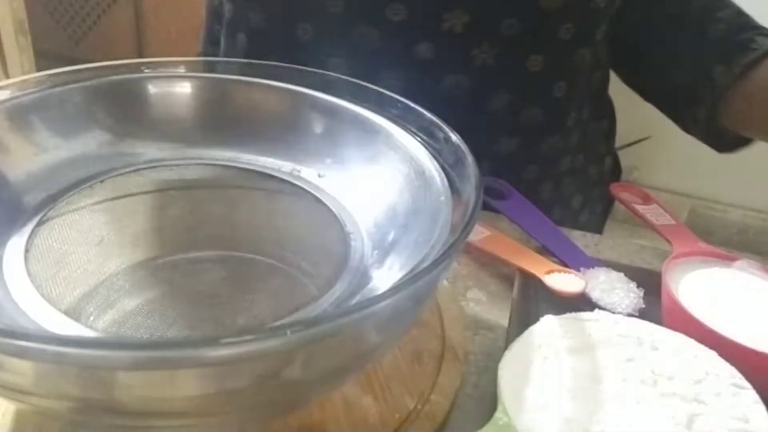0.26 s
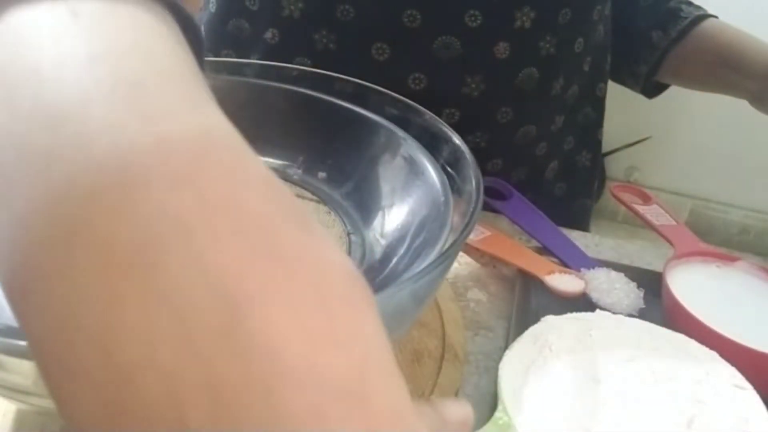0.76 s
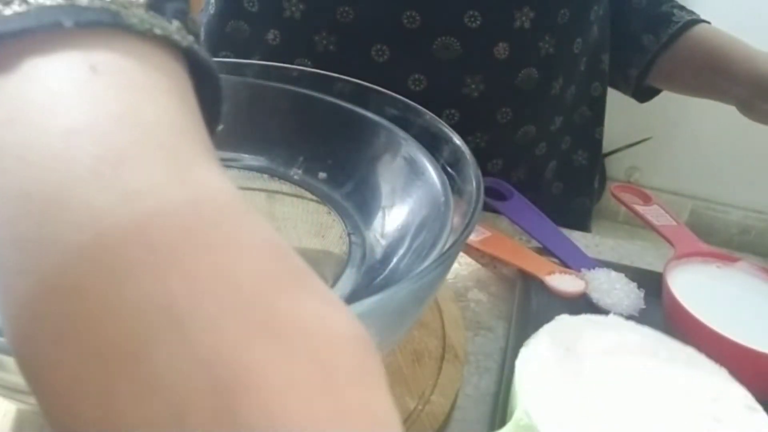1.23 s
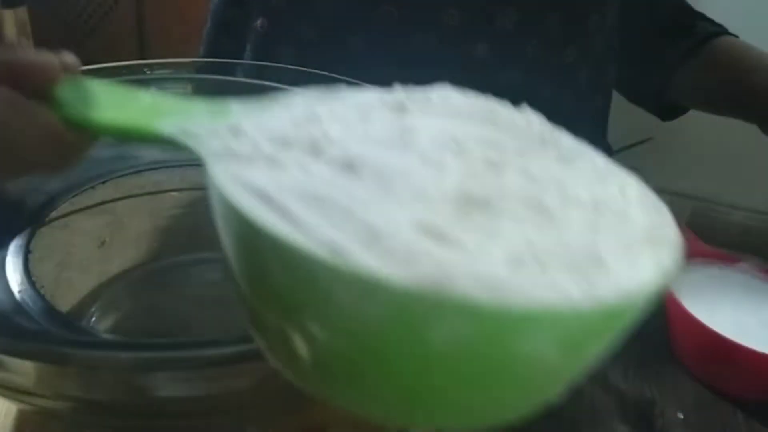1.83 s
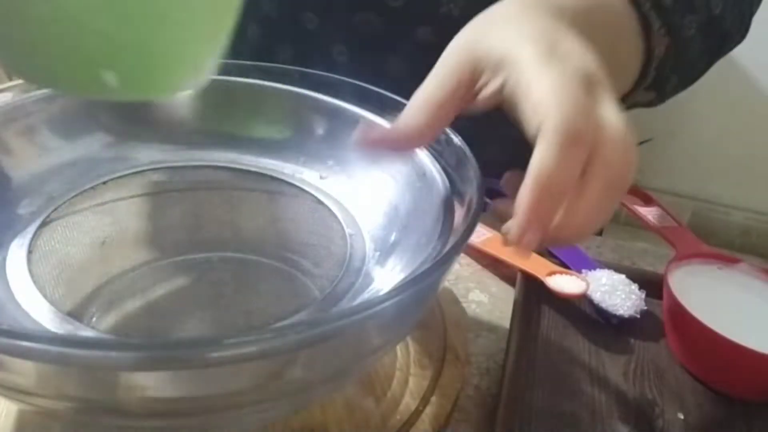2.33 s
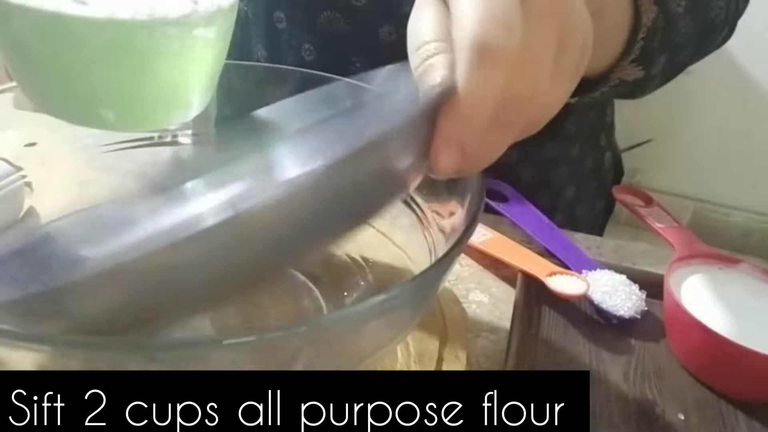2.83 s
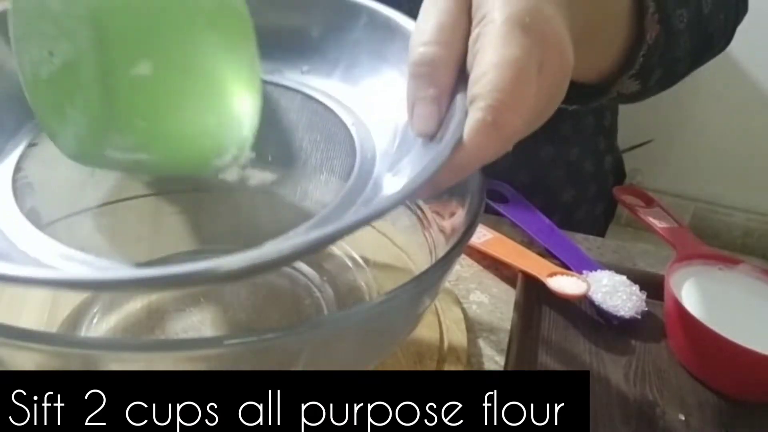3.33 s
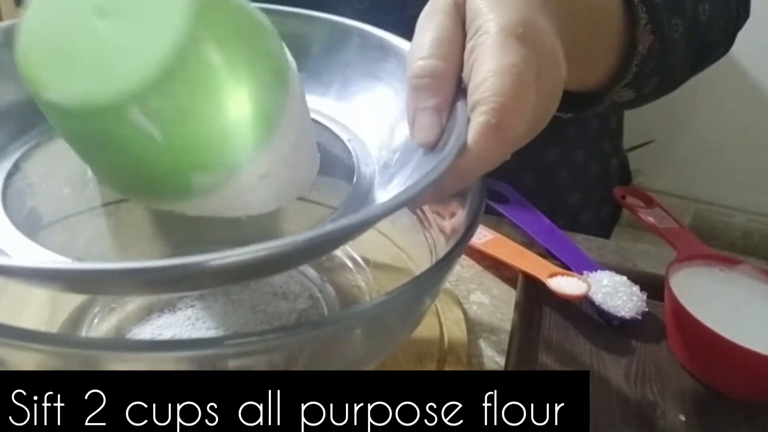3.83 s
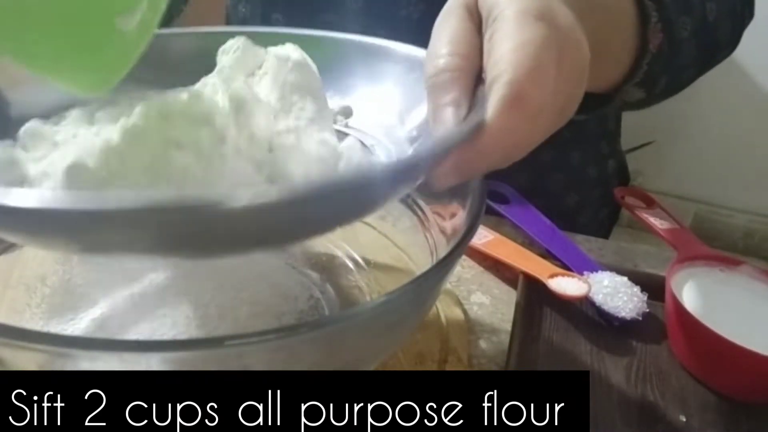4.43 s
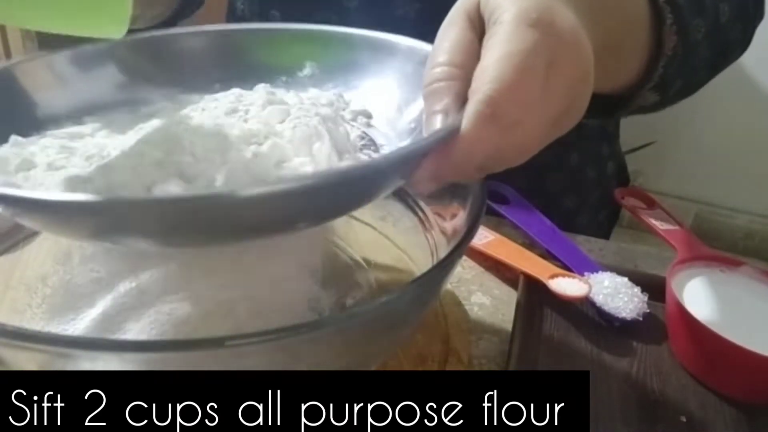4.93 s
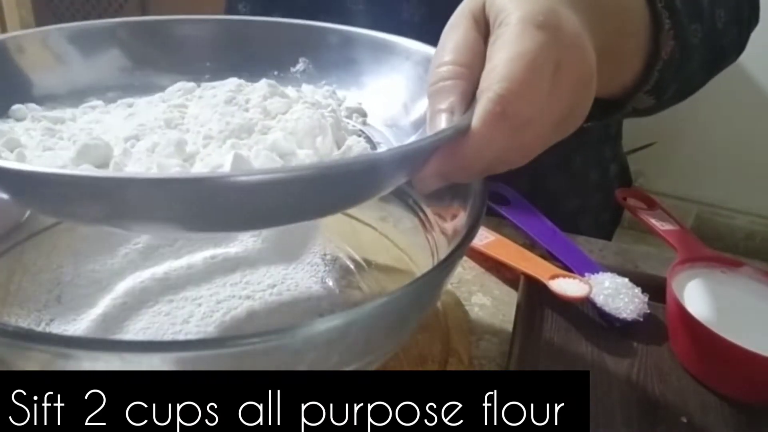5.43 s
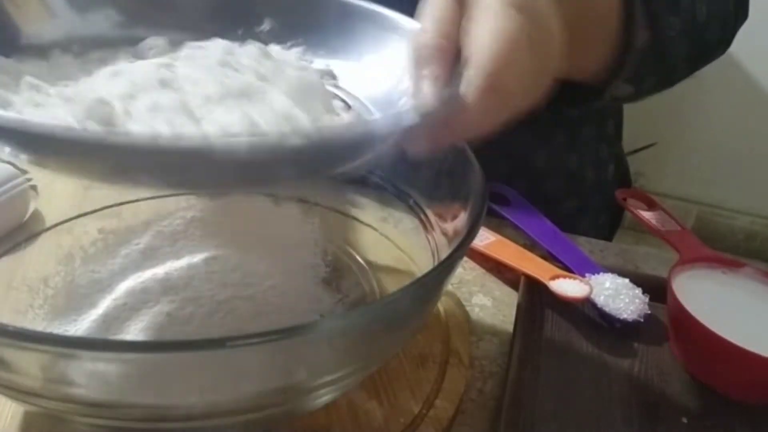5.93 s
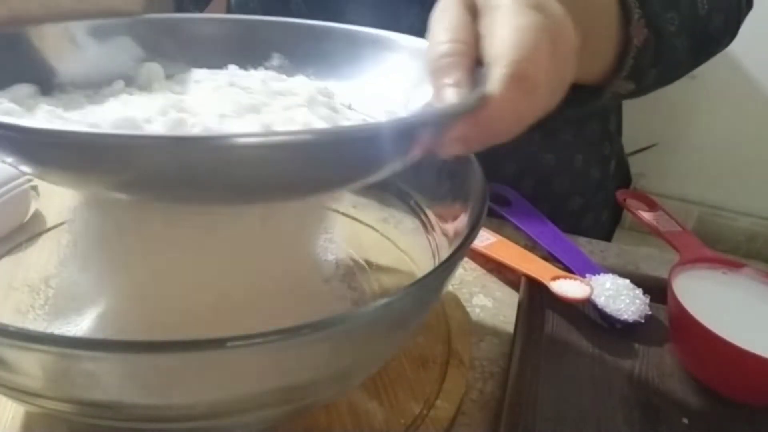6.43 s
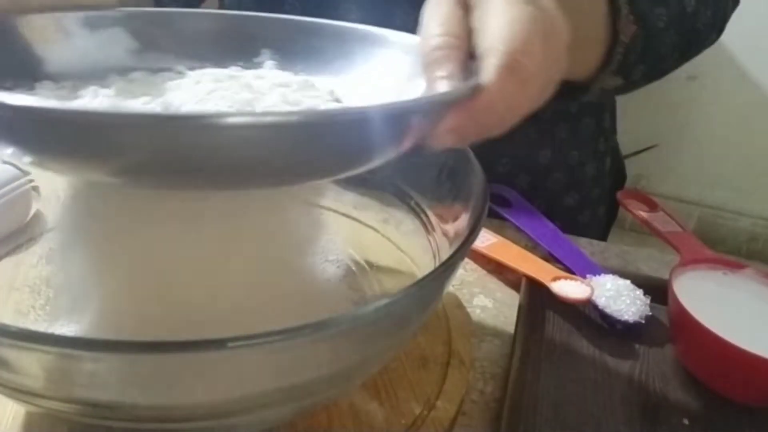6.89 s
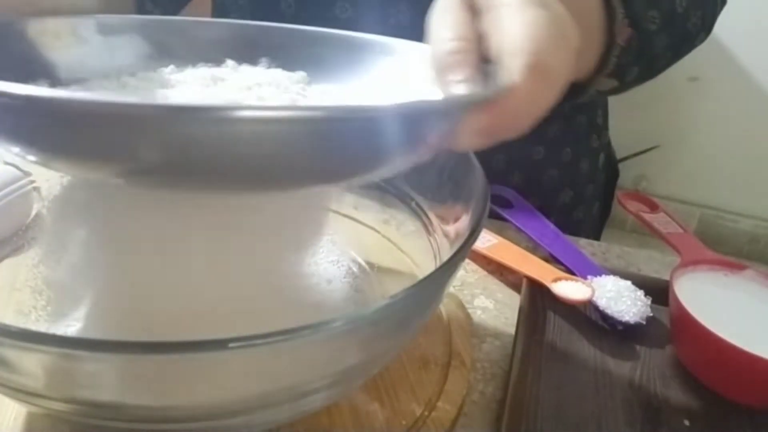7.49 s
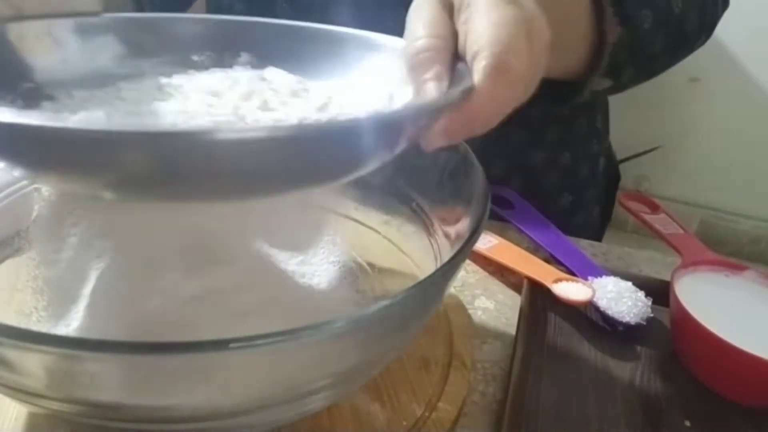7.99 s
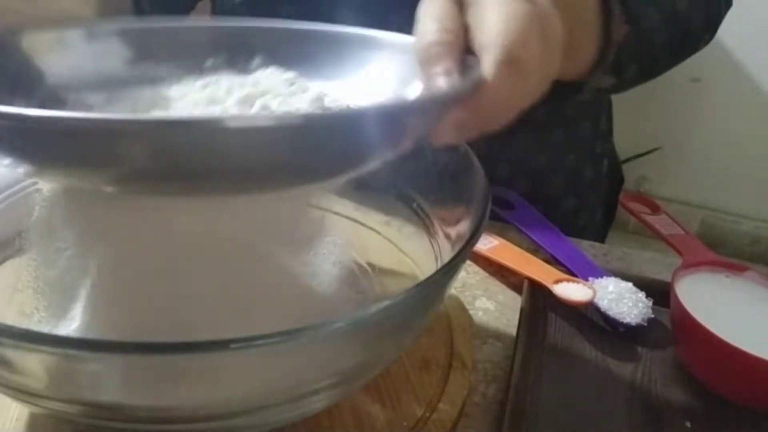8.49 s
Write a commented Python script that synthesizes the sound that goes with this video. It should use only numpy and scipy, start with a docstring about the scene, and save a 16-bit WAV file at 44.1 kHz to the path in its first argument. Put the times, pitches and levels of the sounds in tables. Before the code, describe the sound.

A metal sieve clinks on a glass bowl, wood bangs twice, then flour is sifted with soft, even swishes and ticks.

```python
"""A small, hard-walled kitchen, with a stereo pair near a glass bowl where flour is being sifted.
The steel sieve scrapes off the bowl and clinks on its rim, setting the glass singing. A plastic cup
judders across the sieve as it tips in flour, and something wooden bangs twice nearby. Then the sieve
is shaken at an even beat, about seven times a second: flour swishes through the wires and lumps tick
on the mesh. Behind it all lie a low room rumble and a faint hiss."""
import sys
import numpy as np
from scipy import signal
from scipy.fft import rfft, irfft
from scipy.io import wavfile
from scipy.ndimage import uniform_filter1d

SR = 44100
rng = np.random.default_rng(int(sys.argv[2]) if len(sys.argv) > 2 else 0)


def transcribe(signal):
    """Save signal, clipped to [-1, 1], as a 16-bit WAV file at the path in sys.argv[1]."""
    frames = np.atleast_2d(signal).T
    limited = np.clip(frames, -1, 1)
    pcm = np.round(limited * 32767).astype(np.int16)
    wavfile.write(sys.argv[1], SR, pcm)


N = 385875
TIME = np.arange(N) / SR

# spectrum of flour brushing the wires: f/Hz, level/dB
FLOUR_SPECTRUM = [(220, -23), (400, 2), (600, -12), (850, -7.5), (1300, -17), (1650, -3), (2300, -9.5),
                  (3100, 2), (4300, -0.5), (5700, -3), (7200, 7.5), (9500, 1), (12500, 0), (15500, 2)]
# strokes of the sieve at their fastest, timid at first, then at an even beat: t/s, level/dB
SHAKES = [(4.13, -67), (4.245, -70), (4.35, -74), (4.45, -73), (4.555, -67.5), (4.661, -72), (4.762, -66.5),
          (4.872, -66), (5.926, -60.5), (6.083, -62.5), (6.205, -62.5), (6.36, -58.5), (6.522, -59),
          (6.668, -58.5), (6.809, -58.5), (6.959, -58), (7.106, -57.5), (7.251, -58), (7.406, -58),
          (7.549, -60.5), (7.692, -59), (7.831, -59.5), (7.98, -59.5), (8.123, -61.5), (8.266, -60.5),
          (8.412, -58.5), (8.558, -58.5), (8.706, -58.5)]
# loose flour sliding by itself: t/s, level/dB, length/s
SLIDES = [(2.205, -69.5, 0.096), (3.85, -76, 0.096)]
# modes of the mesh, damped by its load of flour: f/Hz, level/dB, t60/s
MESH_MODES = [(600, -8, .07), (820, -9, .07), (1130, -9, .07), (1300, -7, .08), (1750, -8, .08),
              (2240, -1, .14), (2640, -2, .12), (2820, -3, .12), (2980, -1, .12), (3255, -2, .12),
              (3370, -3, .12), (3770, -2, .14), (4400, -7, .08), (7080, -3, .06)]
# large lumps thrown against the sieve: t/s, level/dB, note of the spot hit f/Hz
LUMPS = [(5.912, -43, 2240), (6.338, -46, 2580), (6.356, -39, 1250), (6.366, -41, 3250), (6.535, -44, 2640),
         (6.670, -38, 3010), (6.807, -37, 2640), (6.816, -39, 3260), (6.955, -39, 3770),
         (7.041, -37.5, 2820), (7.099, -33.5, 2240), (7.253, -42, 3360), (7.411, -35.5, 3130),
         (7.548, -39, 3000), (7.692, -38.5, 2980), (7.834, -41, 2240), (7.981, -38, 3000),
         (8.118, -45, 2640), (8.265, -38, 2660), (8.402, -26.5, 3010), (8.460, -39, 3370),
         (8.684, -46, 2240), (8.702, -33, 3010)]

# brief rubs of steel on glass: t/s, level/dB, length/s, tilt/(dB/octave), squeal f/Hz, squeal level/dB
RUBS = [(0.414, -75, 0.044, -12.5, 680, 6), (0.568, -80.5, 0.095, 2, 4120, 8),
        (0.822, -74, 0.02, 3, 3320, 9), (1.152, -64, 0.078, -2.5, 1730, 0),
        (1.204, -63.5, 0.021, -6.5, 1720, 7), (2.406, -70, 0.019, -5, 1730, 1),
        (3.247, -50, 0.031, -2.5, 2700, -41), (4.603, -75, 0.1, -5, 2220, -7),
        (4.957, -85, 0.21, -20, 760, 11), (5.373, -78.5, 0.14, -8.5, 2340, -3)]
# spectrum of steel rubbing on glass: f/Hz, level/dB
RUB_SPECTRUM = [(180, -62.5), (300, -23.5), (676, -9), (1080, -1.5), (1170, -5), (1470, -4.5), (1770, -2),
                (2020, -3), (2230, 1.5), (3610, -3), (4450, -0.5), (5380, -11.5), (7010, -2),
                (15800, -12.5)]
# pressure of the sieve as it is dragged off the rim, catching on the way: t/s, level/dB
LIFT_PRESSURE = [(2.43, -61.5), (2.46, -54.5), (2.49, -61), (2.56, -53), (2.585, -69), (2.632, -56),
                 (2.652, -49), (2.69, -53), (2.755, -71), (2.786, -47.5), (2.83, -67.5)]
# sharp taps of the sieve: t/s, level/dB, tilt/(dB/octave), scuff level/dB
TAPS = [(1.214, -32, -5, 6), (2.437, -33, -4, 4), (2.458, -25, -4, 4), (2.507, -36, -2, 6),
        (2.547, -34, -1, 6), (2.648, -26, -1.5, 8), (2.745, -32, -3, 2), (2.765, -23, 7, 8),
        (2.784, -32, -1, 6), (2.944, -14.5, -0.5, -2), (2.947, -22, -1, 6), (2.954, -29, 0, 6),
        (3.133, -44, -2, 6), (3.186, -38.5, -1, 8)]
# spectrum of a tap on the steel: f/Hz, level/dB
TAP_SPECTRUM = [(120, -76), (200, -14), (1060, -8), (1200, -6), (1490, -2.5), (1680, -10.5), (1930, -4.5),
                (2890, -8.5), (3340, -2), (4500, -5.5), (5300, -8.5), (15800, -18.5)]
# modes of the sieve's steel pan: f/Hz, level/dB, t60/s
PAN_MODES = [(689, -12, .25), (885, -12, .3), (1320, -9, .16), (1480, -3, .18), (2060, -3, .16),
             (2293, -8, .16), (2520, -3, .16), (2780, -5, .14), (3060, -9, .12), (3500, -3, .18),
             (3740, -3, .15), (3880, -6, .16), (5010, -14, .14), (7170, -10, .12)]
# squeaks of the sticking steel: t/s, level/dB, half-length/s, start f/Hz, end f/Hz
SQUEAKS = [(1.00, -75, .03, 1700, 1720), (1.125, -71, .02, 1720, 1720), (1.168, -64, .014, 1620, 1660),
           (1.214, -57, .006, 1630, 1690), (1.245, -69, .009, 1720, 1720), (2.515, -61, .018, 1330, 1300),
           (2.557, -58, .012, 3130, 3230), (2.653, -47.5, .008, 2490, 2540),
           (2.657, -47.5, .009, 2030, 2075), (2.665, -53, .010, 2930, 2850),
           (2.670, -46.5, .008, 3730, 3765), (2.674, -53, .008, 2560, 2530), (2.712, -54, .016, 3480, 3515),
           (2.714, -59, .010, 2080, 2060), (2.788, -55, .008, 1480, 1440), (2.794, -52, .010, 2720, 2790),
           (2.803, -49, .013, 3520, 3480), (4.08, -80, .025, 4300, 4340), (4.615, -76, .012, 3790, 3770),
           (4.70, -85, .035, 4650, 4850), (4.824, -70, .011, 3800, 3780)]

# touches that set the bowl singing: t/s, level/dB, build-up/s
BOWL_TOUCHES = [(2.651, -51, 0.11), (4.079, -77, 0.0044), (2.944, -19.5, 0.34), (3.239, -62, 0.058),
                (4.601, -42, 0.48), (4.819, -63, 0.033), (6.381, -73, 0.021), (6.811, -73, 0.022),
                (7.129, -69.5, 0.02)]
# the two halves of the bowl's split lowest mode: left level/dB, right level/dB, t60/s
BOWL_HALVES = [(-7.5, -0.5, 0.58), (-9.5, -4.5, 0.58)]
# the bowl's upper modes, woken only by a hard hit: f/Hz, level/dB, t60/s
BOWL_OVERTONES = [(1497, -4, .25), (1814, -5, .4), (1938, -7, .45), (2735, -2, .38), (3297, -3, .3),
                  (3352, -5, .36), (3779, 0, .25), (3946, -6, .25), (4344, -8, .25), (5184, -15, .25),
                  (6309, -8, .22), (7838, -15, .2)]

# the cup dragged across the sieve: t/s, judder level/dB, rasp level/dB, rise/s, fall/s
CUP_DRAGS = [(3.547, -55, -70, 0.006, 0.0026), (3.571, -38, -43, 0.015, 0.0064),
             (3.594, -36.5, -43.5, 0.0079, 0.0065), (3.617, -39.5, -66, 0.007, 0.0053),
             (3.658, -43, -61, 0.0079, 0.013)]
# modes of the cup's hollow: f/Hz, level/dB, t60/s
CUP_MODES = [(336, 3, 0.017), (423, -6, 0.058), (499.5, -5.5, 0.18), (608, -5, 0.096), (699, -4, 0.073)]
# the judder locking onto a resonance of the cup: t/s, level/dB, half-length/s, start f/Hz, end f/Hz
CUP_BOOMS = [(3.551, -48, .004, 340, 325), (3.560, -49, .009, 685, 610), (3.587, -45, .009, 475, 490),
             (3.605, -51, .006, 335, 325), (3.612, -42.5, .009, 505, 495), (3.614, -48, .007, 680, 680),
             (3.660, -57, .005, 335, 325)]
# spectrum of plastic rasping on steel: f/Hz, level/dB
RASP_SPECTRUM = [(470, -45), (800, -7), (970, -0.5), (1240, -4), (1610, -5), (2460, -0.5), (3900, -7),
                 (5200, -14.5), (7110, -4.5), (8360, -14), (15800, -19.5)]
# handling bumps of cup and pan: t/s, level/dB, tilt/(dB/octave), scuff level/dB
BUMPS = [(1.739, -18, -4.5, -8), (1.762, -36, 1, 4), (1.778, -37, 1, 4), (2.795, -37, -3, 14),
         (4.475, -30, -7, 0), (4.777, -39, -7, 4), (6.96, -40, -4.5, 15), (8.15, -38, -10, 8)]
# spectrum of a dull bump: f/Hz, level/dB
BUMP_SPECTRUM = [(160, -40), (280, -2.5), (596, -5), (774, -15), (1020, -6), (1180, -25), (1670, -15.5),
                 (3300, -28), (9000, -47), (11700, -82), (19800, -120)]

# wooden knocks and their rattles: t/s, level/dB, tilt/(dB/octave), lowest driven f/Hz
KNOCKS = [(5.385, -16, 6, 450), (5.388, -7, 4, 400), (5.401, -13, -4, 170), (5.419, -13.5, 4.5, 140),
          (5.434, -25, -1, 121), (5.532, -44, -3, 130), (5.587, -17, 4, 245), (5.596, -8.5, 2, 108),
          (5.606, -23.5, -2.5, 110), (5.668, -55, -7, 203)]
# spectrum of a knock on wood: f/Hz, level/dB
KNOCK_SPECTRUM = [(90, -22), (160, 1.5), (215, 3), (330, 1), (440, 1), (550, 3), (690, -3.5), (790, -7),
                  (910, 3.5), (1030, -9), (1520, -10.5), (2400, -22), (3600, -33), (5800, -43.5),
                  (7150, -39.5), (9000, -56), (15500, -56)]
# modes of the wood and the corner around it: f/Hz, level/dB, t60/s
WOOD_MODES = [(158, 0, .55), (199, 0, .22), (277, -1, .3), (333, -1, .28), (402, 0, .22), (520, -2, .2),
              (546, -3, .2), (614, -3, .24), (681, 0, .22), (778, -3, .18), (832, -4, .31), (918, 3, .25),
              (1417, -2, .25), (1518, 3, .22), (1906, 1, .2), (2056, 3, .2), (2432, 3, .18)]
# the short, dead boom of the struck panel: f/Hz, level/dB, t60/s
PANEL_MODES = [(490, 0, .035), (590, -1, .03), (670, -3, .035)]
# dishes ringing along with the knocks: f/Hz, level/dB, t60/s
DISH_MODES = [(894, -11, .48), (947, -10, .42), (1028, -7, .3), (1077, -9, .6), (1179, -9, .58),
              (1260, -9, .45), (1453, -7, .4), (1604, -7, .35), (1690, -8, .55), (1733, -8, .6),
              (1814, -7, .5), (1997, -7, .4), (2126, -6, .25), (2277, -6, .3)]

# spectrum of the room rumble: f/Hz, level/dB
RUMBLE_SPECTRUM = [(25, -32), (50, -23.5), (75, -13.5), (93, -0.5), (110, -8.5), (135, -5.5), (158, -1),
                   (175, 5), (195, -9), (280, -22.5), (450, -41), (900, -70.5)]
# slow rise and fall of the rumble: t/s, level/dB
RUMBLE_LEVEL = [(.45, -55.5), (1.3, -59.5), (1.6, -68.5), (2.1, -70), (2.7, -66), (3.3, -70), (4.2, -71),
                (4.6, -66), (5.3, -69), (6.3, -66), (6.55, -72.5), (6.92, -63), (7.45, -71.5),
                (7.85, -61.5), (8.15, -68.5), (8.75, -66)]
# spectrum of the steady hiss: f/Hz, level/dB
HISS_SPECTRUM = [(150, -23), (250, -4), (413, -10), (813, -14), (967, -11.5), (2470, -18), (3370, -21),
                 (3620, -24.5), (4080, -21.5), (4770, -24.5), (7000, -22.5), (7600, -19), (8300, -21),
                 (9230, -28.5), (15800, -27)]
# spectrum of the louder opening hiss: f/Hz, level/dB
OPENING_HISS_SPECTRUM = [(150, -26), (250, -3), (413, -8.5), (700, -9.5), (967, -13), (2470, -17),
                         (3620, -19), (4080, -19.5), (4770, -22.5), (6990, -14.5), (9230, -24.5),
                         (15800, -26)]
# reverberation time of the kitchen: f/Hz, t60/s
KITCHEN_T60 = [(100, 0.74), (300, 0.33), (1000, 0.31), (3000, 0.27), (7000, 0.3), (15000, 0.18)]
# likeness of the room sound at the two microphones: f/Hz, correlation
MIC_LIKENESS = [(60, 0.74), (140, 1), (290, 0.7), (640, 0.33), (1400, -0.31), (3000, 0.049), (15000, 0.032)]


def flour():
    """Grains brush the wires on each stroke, crumbs tick on the mesh and the pan knocks in the hand."""
    speed = strokes(shakes() + [(s, db, length / 2, length / 2) for s, db, length in SLIDES])
    brushing = through(speed * grains(per_s=5000, spread_db=4.8), click(FLOUR_SPECTRUM))
    crumbs = 0
    for hz, _, _ in MESH_MODES:
        patchy_db = 3 * waver(per_s=9)   # the heap shifts, hitting now one resonance, now another
        crumbs += from_db(patchy_db) * resonance(grains(per_s=70, spread_db=3), hz, width_hz=60)
    crumbs = from_db(-4.5) * speed * rms_one(crumbs)
    jolting = uniform_filter1d(speed, size=5000) * grains(per_s=60, spread_db=0)
    jolts = from_db(-15.5) * through(jolting, click(BUMP_SPECTRUM))
    return kitchen(crumbs, wet_db=-3) + kitchen(brushing + jolts, wet_db=7)


def shakes(rise_s=0.017, fall_s=0.027, at_db=-59.5, stretch_per_db=0.15):
    """The harder a stroke, the longer the flour slides: t/s, level/dB, rise/s, fall/s."""
    rows = []
    for s, db in SHAKES:
        stretch = np.exp(stretch_per_db * (db - at_db))
        rows.append((s, db, rise_s * stretch, fall_s * stretch))
    return rows


def lumps(note_db=-3, note_t60_s=0.021):
    """Each lump ticks on the sieve and briefly sounds the note of the spot where it lands."""
    ticking = blows([(s, db, -1, 0) for s, db, _ in LUMPS], TAP_SPECTRUM)
    notes = np.zeros((2, N))
    for s, db, hz in LUMPS:
        add(notes, s, from_db(db + note_db) * ringing([(hz, 0, note_t60_s)]))
    return kitchen(ticking, wet_db=1.5) + notes + rings(ticking, MESH_MODES, ring_db=-6)


def sieve_on_rim(rise_share=0.58):
    """Steel sticks and slips on the glass, each rub catching one resonance, and now and then taps it."""
    slips = grains(per_s=1800, spread_db=5.5)
    rubbing = lift_off(slips)
    for s, db, length, tilt_db, squeal_hz, squeal_db in RUBS:
        rise = length * rise_share
        friction = slips * strokes([(s, db, rise, length - rise)])
        rubbing += scrape(friction, tilt_db)
        rubbing += from_db(squeal_db) * resonance(friction, squeal_hz, width_hz=77)
    tapping = blows(TAPS, TAP_SPECTRUM, scuff_s=0.002)
    rubs = kitchen(rubbing, wet_db=4.5) + rings(rubbing, PAN_MODES, ring_db=-7)
    taps = kitchen(tapping, wet_db=-2) + rings(tapping, PAN_MODES, ring_db=-11)
    return rubs * left_right(-1.5, 0.5) + taps * left_right(2.5, 4.5)


def lift_off(slips, outward_at_s=2.46, outward_for_s=0.047):
    """One long scrape as the sieve leaves the rim, brightening as the contact moves out to the edge."""
    friction = slips * from_db(np.interp(TIME, *np.transpose(LIFT_PRESSURE), left=-200, right=-200))
    edge = np.clip((TIME - outward_at_s) / outward_for_s, 0, 1)
    return scrape(friction * (1 - edge), tilt_db=-7) + scrape(friction * edge, tilt_db=-0.5)


def scrape(friction, tilt_db):
    """Every slip sounds a tiny click of steel on glass."""
    return signal.oaconvolve(friction, click(RUB_SPECTRUM, tilt_db))[:N]


def squeaking_steel():
    """The steel squeaks at a pitch that shifts as the point of contact moves."""
    return kitchen(stick_slip(SQUEAKS), wet_db=-5, lag_samples=3) * left_right(-2, 0)


def bowl(split_hz=(1050, 1052.1), clink_s=2.944, clink_db=-18.5):
    """Each touch feeds two close pitches of the glass, which beat; the hard clink adds overtones."""
    out, t = np.zeros((2, N)), TIME[:SR]
    for s, db, build_s in BOWL_TOUCHES:
        for hz, (left_db, right_db, t60) in zip(split_hz, BOWL_HALVES):
            swell = (1 - np.exp(-t / build_s)) * from_db(db - 60 * t / t60)
            add(out, s, left_right(left_db, right_db) * swell * np.sin(2 * np.pi * hz * t))
    add(out, clink_s, from_db(clink_db) * ringing(BOWL_OVERTONES))
    return out


def cup():
    """The plastic cup bumps and judders: slow slips boom in its hollow, fine ones rasp on the steel."""
    judder_swell = strokes([(s, db, rise, fall) for s, db, _, rise, fall in CUP_DRAGS])
    rasp_swell = strokes([(s, db, rise, fall) for s, _, db, rise, fall in CUP_DRAGS])
    judder = judder_swell * grains(per_s=790, spread_db=1)
    band = signal.butter(3, [270, 1100], "band", fs=SR, output="sos")   # too small to radiate bass
    hollow = signal.sosfilt(band, rings(judder, CUP_MODES, ring_db=-7.5))
    rasp = through(rasp_swell * grains(per_s=2500, spread_db=5), click(RASP_SPECTRUM))
    booming = kitchen(stick_slip(CUP_BOOMS), wet_db=-5, lag_samples=12)
    dragging = kitchen(hollow + rasp, wet_db=2.5, lag_samples=12)
    bumping = kitchen(blows(BUMPS, BUMP_SPECTRUM), wet_db=3, lag_samples=4)
    return (dragging + booming) * left_right(0, 1.8) + bumping


def wooden_knocks(chatter_db=-39, chatter_t60_s=0.33):
    """Wood bangs off to the right: the panel thuds, loose things chatter and dishes ring along."""
    contacts, shaking = np.zeros(N), np.zeros(N)
    for s, db, tilt_db, lowest_hz in KNOCKS:
        low_cut = signal.butter(2, lowest_hz, "high", fs=SR, output="sos")   # a first touch lacks bass
        add(contacts, s, from_db(db) * signal.sosfilt(low_cut, click(KNOCK_SPECTRUM, tilt_db)))
        add(shaking, s, from_db(db - 60 * TIME[:SR] / chatter_t60_s))
    rattles = from_db(chatter_db) * shaking * grains(per_s=160, spread_db=3)
    thud = rings(contacts, PANEL_MODES, ring_db=-19)
    banging = kitchen(contacts, wet_db=4, lag_samples=15) + rings(contacts, WOOD_MODES, ring_db=-16)
    chatter = kitchen(through(rattles, click(KNOCK_SPECTRUM, tilt_db=3)), wet_db=-3, lag_samples=15)
    dishes = rings(contacts, DISH_MODES, ring_db=-25)
    return from_db(10.3) * (banging + thud + chatter + dishes)


def room_tone(begin_s=0.35, rise_s=0.088, settle_s=1.278, fall_s=0.24):
    """The sound starts at 0.35 s: a wavering rumble and an even hiss from all sides, raised for about a second,
    then settling."""
    fade_in = np.clip((TIME - begin_s) / rise_s, 0, 1)
    raised = np.clip(1 - (TIME - settle_s) / fall_s, 0, 1) ** 2
    hiss = from_db(-76) * through(diffuse(N), click(HISS_SPECTRUM))
    opening_hiss = from_db(-63) * through(diffuse(N), click(OPENING_HISS_SPECTRUM))
    rumble_db = np.interp(TIME, *np.transpose(RUMBLE_LEVEL)) + 2.5 * waver(per_s=19)
    rumble = from_db(rumble_db) * through(diffuse(N), click(RUMBLE_SPECTRUM))
    return fade_in ** 2 * rumble + fade_in * (hiss + raised * opening_hiss)


def kitchen(x, wet_db, lag_samples=6, build_s=0.00086, early_db=5, early_s=0.0049):
    """Direct sound, at the right microphone first, then dense reflections whose treble dies soonest."""
    hz, frame_s, cells = signal.stft(diffuse(SR), SR, nperseg=256)
    decay = from_db(-60 * frame_s / at_hz(KITCHEN_T60, hz)[:, None])
    tail, t = signal.istft(cells * decay, SR)[1][:, :SR], TIME[:SR]
    tail *= 1 - np.exp(-t / build_s)
    tail *= 1 + from_db(early_db) * np.exp(-t / early_s)   # early returns off worktop and walls
    response = from_db(wet_db) * tail / np.linalg.norm(tail[0])
    response[[0, 1], [lag_samples, 0]] += 1   # the direct path
    return through(x, response / np.sqrt(1 + from_db(2 * wet_db)))   # the power is kept


def diffuse(size):
    """White noise arriving from all sides: alike at both microphones only in the bass."""
    mid, side = rfft(rng.standard_normal((2, size)))
    alike = at_hz(MIC_LIKENESS, np.fft.rfftfreq(size, 1 / SR))
    return irfft(np.sqrt((1 + alike) / 2) * mid + np.sqrt((1 - alike) / 2) * side * [[1], [-1]], size)


def strokes(rows):
    """On each hand movement the speed swells and ebbs in a bell curve."""
    speed, t = np.zeros(N), TIME[:SR * 3 // 5] - 0.3
    for s, db, rise, fall in rows:
        away = np.minimum(np.abs(t) / np.where(t < 0, rise, fall), 10)
        add(speed, s + t[0], from_db(db) * np.exp(-away ** 2 / 2))
    return speed


def stick_slip(rows, wobble_share=0.008, flutter_db=3):
    """Short gliding friction tones; uneven slipping shakes their pitch and level."""
    out, t = np.zeros(N), TIME[:SR // 4] - 1 / 8
    for s, db, half_s, start_hz, end_hz in rows:
        wobble, flutter = (waver(per_s=300)[:len(t)] for _ in range(2))
        hz = np.interp(t, [-half_s, half_s], [start_hz, end_hz]) * (1 + wobble_share * wobble)
        swell = from_db(db + flutter_db * flutter) * np.exp(-(t / half_s) ** 2 / 2)
        add(out, s + t[0], swell * np.sqrt(2) * np.sin(2 * np.pi * np.cumsum(hz) / SR))
    return out


def blows(rows, spectrum, scuff_s=0.0024):
    """Each contact is a coloured click followed by a brief scuff."""
    out, t = np.zeros(N), TIME[:SR // 20]
    for s, db, tilt_db, scuff_db in rows:
        scuff = rng.standard_normal(len(t)) * np.exp(-t / scuff_s)
        force = from_db(scuff_db) * scuff / np.linalg.norm(scuff) + (t == 0)
        force /= np.linalg.norm(force)
        add(out, s, from_db(db) * signal.fftconvolve(force, click(spectrum, tilt_db)))
    return out


def grains(per_s, spread_db):
    """Tiny slips at random moments and of random size; rms 1."""
    sizes = from_db(spread_db * np.minimum(rng.exponential(1, N), 4)) * rng.choice([-1, 1], N)
    return rms_one(sizes * (rng.random(N) < per_s / SR))


def click(spectrum, tilt_db=0, size=4096):
    """A minimum-phase click of unit energy with the given spectrum, tilted per octave above 500 Hz."""
    hz, index = np.fft.rfftfreq(size, 1 / SR), np.arange(size)
    level_db = at_hz(spectrum, hz) + tilt_db * np.log2(np.maximum(hz, 500))
    cepstrum = irfft(np.log(from_db(level_db)))
    causal = (index > 0) & (index < size // 2)
    pulse = irfft(np.exp(rfft(2 * cepstrum * causal)))
    return pulse / np.linalg.norm(pulse)


def rings(x, modes, ring_db):
    """The modes of an object, set ringing by its contacts."""
    return from_db(ring_db) * through(x, ringing(modes))


def ringing(modes):
    """Decaying sines of unit energy in all; only low modes agree in phase between the microphones."""
    out, t = 0, TIME[:SR]
    for hz, db, t60 in modes:
        apart = np.arccos(at_hz(MIC_LIKENESS, hz)) * rng.choice([-1, 1]) * np.array([[0.5], [-0.5]])
        out += from_db(db - 60 * t / t60) * np.sin(2 * np.pi * (hz * t + rng.random()) + apart)
    return out / np.linalg.norm(out[0])


def resonance(x, hz, width_hz):
    """One sharp resonance that keeps the power of white noise."""
    radius = np.exp(-np.pi * width_hz / SR)
    gain = np.sqrt((1 - radius ** 2) / 2)
    feedback = [1, -2 * radius * np.cos(2 * np.pi * hz / SR), radius ** 2]
    return signal.lfilter([gain, 0, -gain], feedback, x + 1e-18)


def waver(per_s):
    """A random wandering of spread about 1."""
    return np.interp(TIME * per_s, np.arange(1000), rng.standard_normal(1000))


def through(x, response):
    """Pass a sound through an impulse response, giving two channels."""
    return signal.fftconvolve(np.atleast_2d(x), np.atleast_2d(response), axes=-1)[:, :N] * np.ones((2, 1))


def add(track, s, sound):
    """Mix a short sound into a track at a given time."""
    start = round(s * SR)
    track[..., start:start + sound.shape[-1]] += sound[..., :N - start]


def at_hz(points, hz):
    """Read a table on a log-frequency axis."""
    known_hz, values = np.transpose(points)
    return np.interp(np.log(np.maximum(hz, 1)), np.log(known_hz), values)


def left_right(left_db, right_db):
    """Gains at the two microphones."""
    return from_db([[left_db], [right_db]])


def from_db(db):
    """Decibels to gain."""
    return 10 ** (np.asarray(db) / 20)


def rms_one(x):
    """Scale to unit rms."""
    return x / np.sqrt(np.mean(x ** 2) + 1e-20)


def scene():
    """The kitchen as it reaches the stereo pair."""
    sifting = flour() + lumps() + sieve_on_rim() + squeaking_steel()
    return sifting + bowl() + cup() + wooden_knocks() + room_tone()


def record(dry, cutoff_hz=15800):
    """The top is cut steeply on both channels."""
    return signal.sosfilt(signal.ellip(12, 0.1, 80, cutoff_hz, fs=SR, output="sos"), dry)


dry = scene()
out = record(dry)
transcribe(out)
```